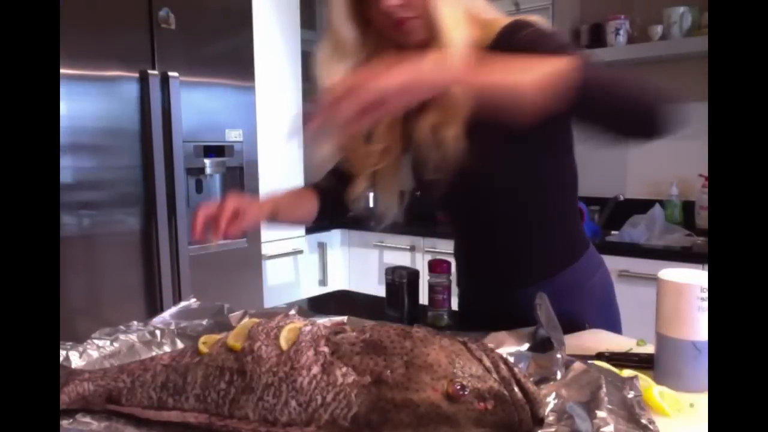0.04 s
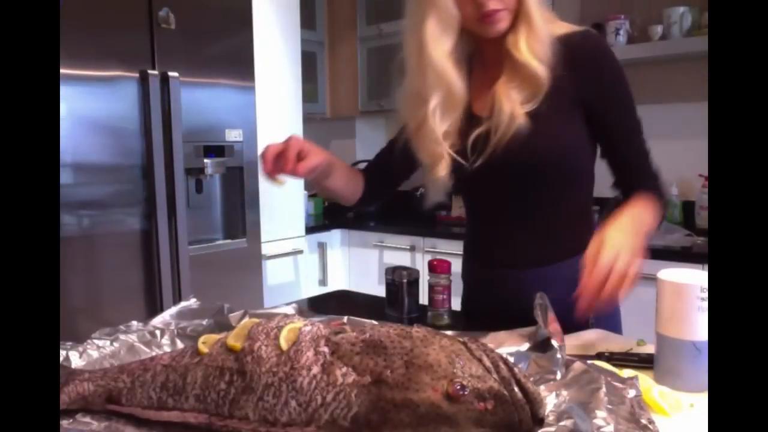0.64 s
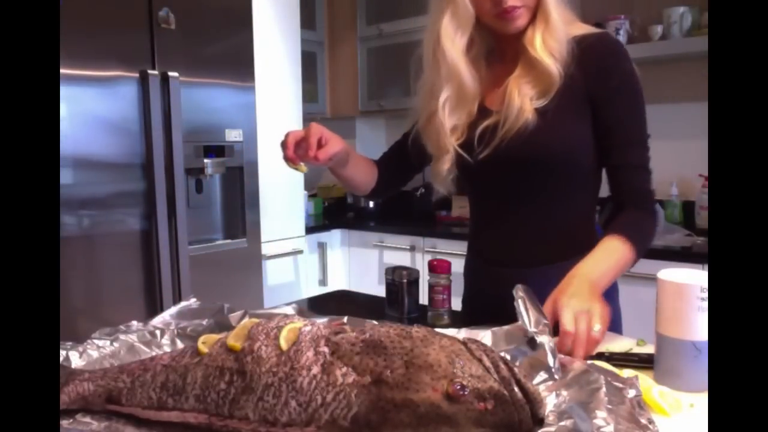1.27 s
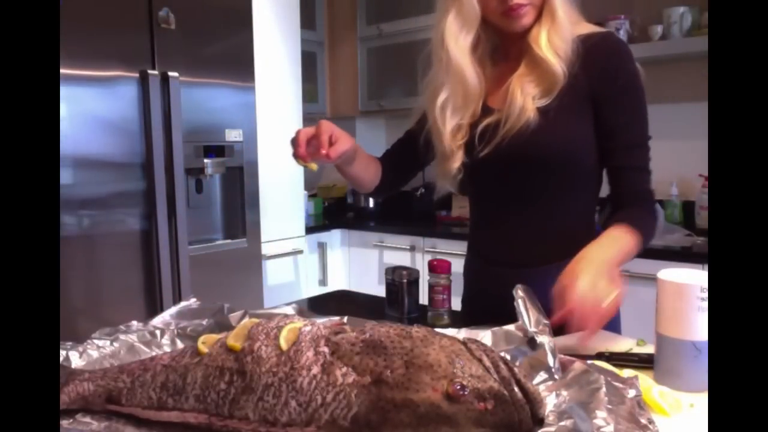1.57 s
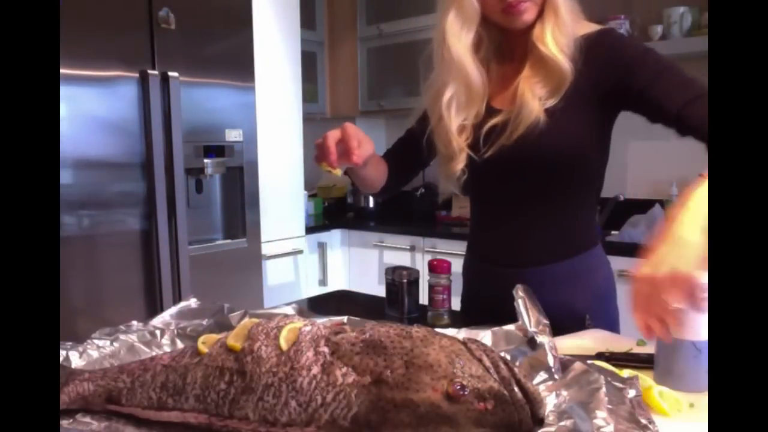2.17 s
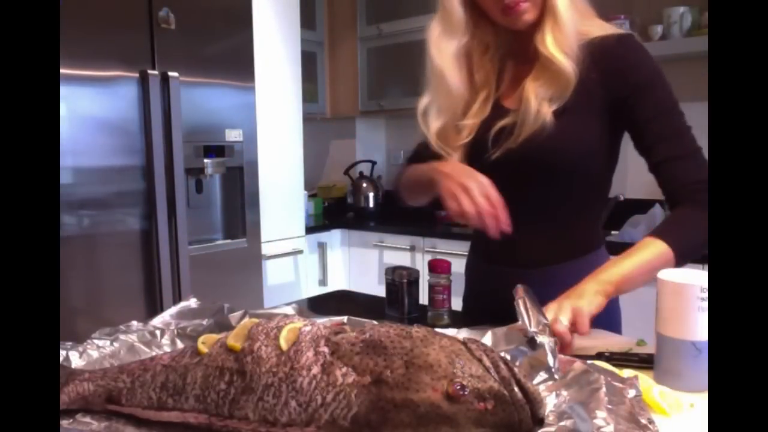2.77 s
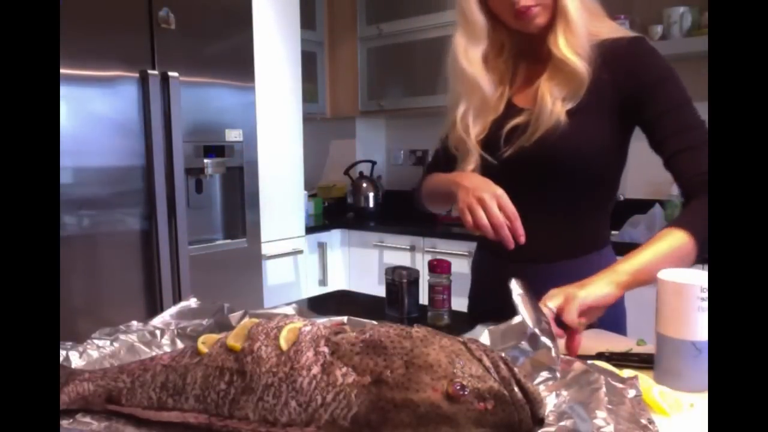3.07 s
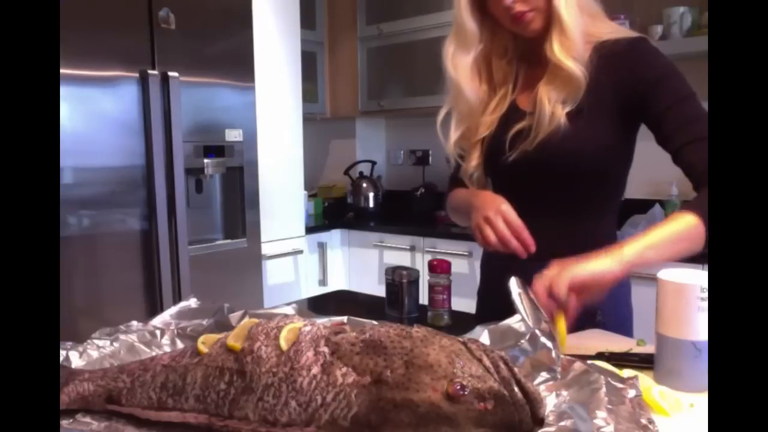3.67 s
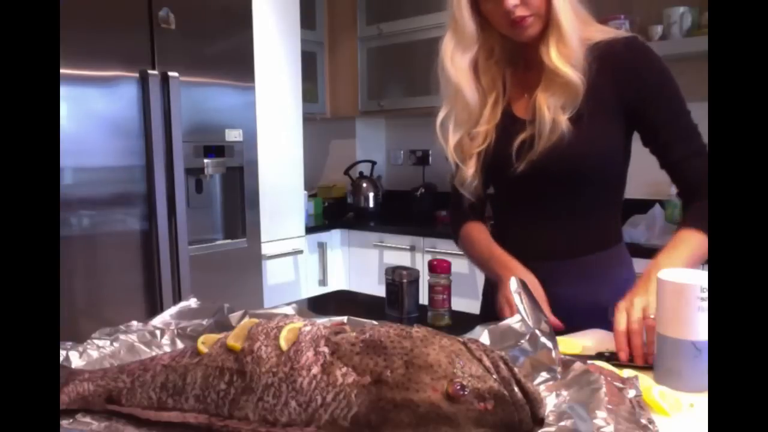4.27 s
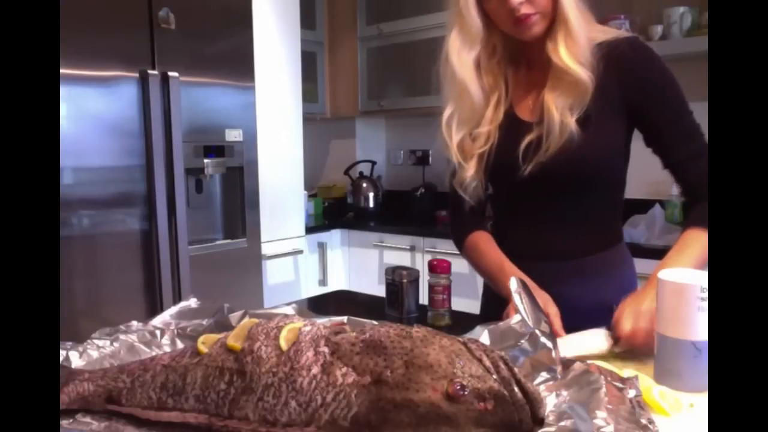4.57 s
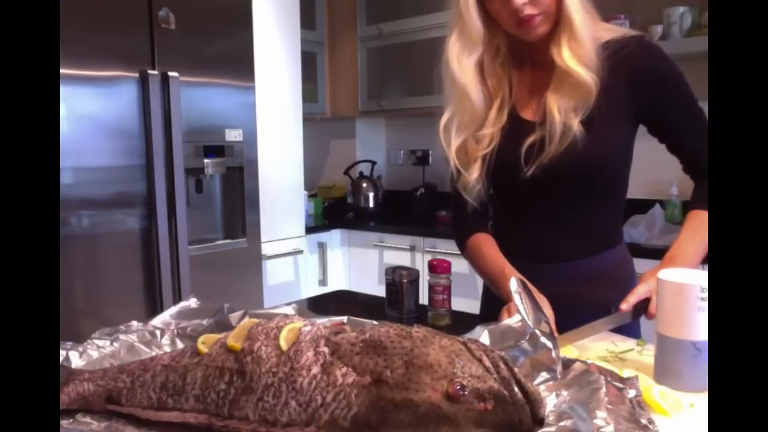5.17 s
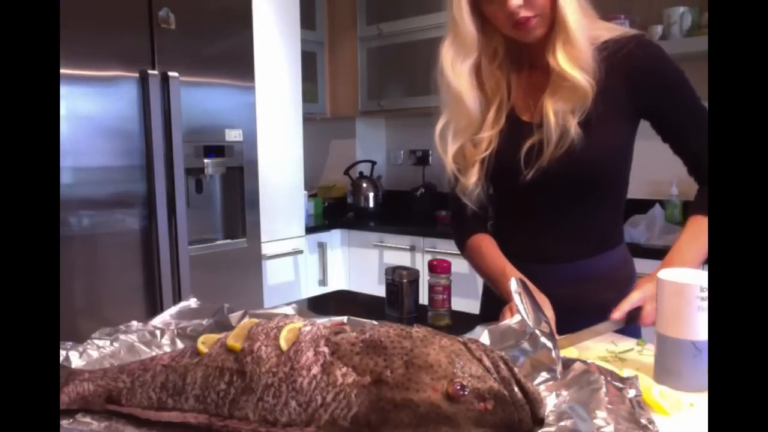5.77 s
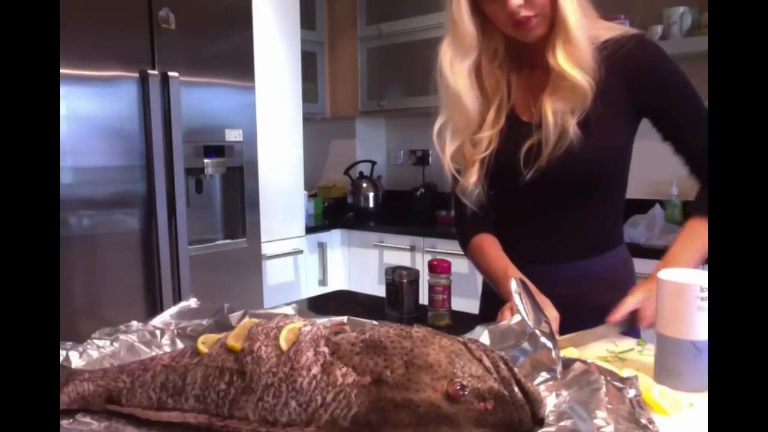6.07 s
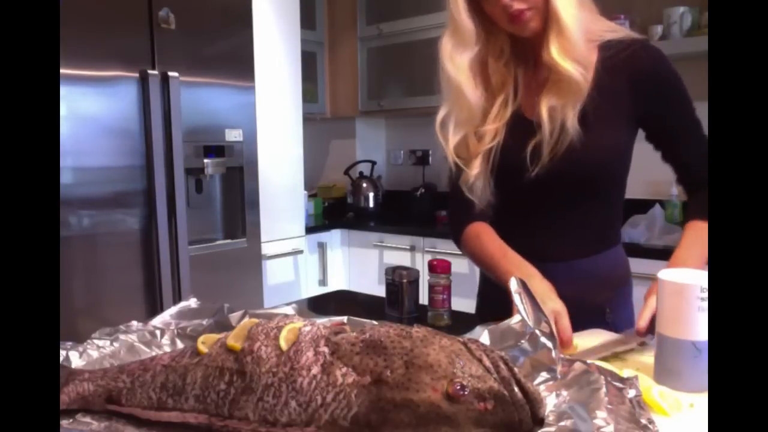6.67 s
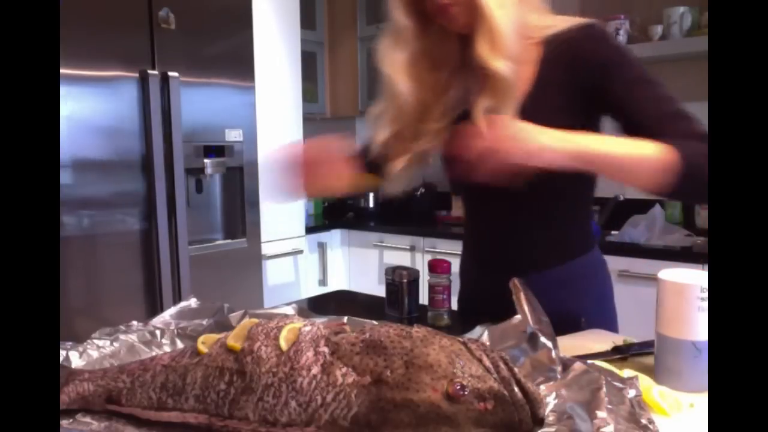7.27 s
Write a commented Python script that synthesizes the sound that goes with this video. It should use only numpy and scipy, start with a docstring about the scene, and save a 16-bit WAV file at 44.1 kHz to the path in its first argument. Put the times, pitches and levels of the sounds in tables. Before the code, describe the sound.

Aluminium foil crackles in short bursts, then a knife chops loudly on a board, squeaks and clatters down in a kitchen.

```python
"""Aluminium foil crackles in bursts as a hand presses it round a fish: each buckle sets off tiny snaps.
A lemon knocks on a board, is chopped with one loud blow and sawn through; the knife squeaks by stick-slip
friction and is dropped with a clatter. The impacts ring in the modes of blade and board and reverberate
in a hard-walled kitchen. Faint ventilation noise lies beneath; a suppressor lowers it in the pauses."""
import sys
import numpy as np
from scipy import signal
from scipy.fft import rfft, irfft
from scipy.io import wavfile
from scipy.ndimage import uniform_filter1d, minimum_filter1d

SR = 44100
rng = np.random.default_rng(int(sys.argv[2]) if len(sys.argv) > 2 else 0)


def store_wav(level_fs):
    """Save 16-bit WAV to argv[1]."""
    pcm = np.round(np.clip(np.atleast_2d(level_fs), -1, 1) * 32767)
    wavfile.write(sys.argv[1], SR, pcm.T.astype(np.int16))


N = 331367
TIME = np.arange(N) / SR
HZ = np.maximum(np.arange(8193) * SR / 16384, 1)   # frequency axis of the spectra


def foil(buckle_db=10.5, crinkle_db=-7.0, flap_db=-21, facet_db=2.25, room_db=1.5):
    """Buckling: the sheet flaps and its facets snap through in a cascade; under the grip it crinkles."""
    # buckles of the sheet: t/s, relative level/dB, tilt above 900 Hz/(dB per octave)
    buckles = [(0.898, -0.5, 4), (0.927, -6, 7), (0.95, -5, 1), (0.980, -5, -0.5), (1.048, -18, -6.5),
               (1.113, -16, -0.5), (1.155, -5, 4), (2.851, -21.5, 0), (2.873, -17, 0), (2.907, -14, 1.5),
               (2.920, -8, 4), (2.954, -5.5, 4), (3.056, -10.5, 2.5), (3.086, -6.5, 1.5), (3.137, -11, 0.5),
               (3.194, -15, 6), (3.248, -12.5, 2), (3.279, -13.5, -2.5), (3.366, -21, 0),
               (3.388, -18, -0.5), (3.417, -15, -0.5), (3.503, -14, 5), (3.512, -11.5, -0.5),
               (6.476, -13, 3), (6.486, -12.5, 0)]
    # spectrum radiated by the foil: f/Hz, level/dB
    foil_colour = [(150, -42), (300, -27.5), (500, -15.5), (750, -18.5), (900, -4.5), (1200, -2.5),
                   (1700, 0.5), (2400, 1), (3200, -1.5), (4300, 2), (5500, -1.5), (7000, -4),
                   (10200, -10.5), (13000, -19), (16000, -24)]
    # grips of the hand: t/s, duration/s, relative level/dB
    grips = [(0.893, 0.08, -21.5), (1.001, 0.21, -32), (2.861, 0.14, -27.5), (3.061, 0.126, -28.5),
             (3.247, 0.14, -42)]
    out, sheet = np.zeros(N), at_hz(foil_colour, HZ)
    facet_hz = np.geomspace(600, 16000, 36)
    for s, db, tilt_db in buckles:
        facets = np.interp(HZ, facet_hz, rng.normal(0, facet_db, len(facet_hz)))
        tilt = tilt_db * np.log2(np.maximum(HZ, 900) / 4000)
        flap_spectrum = np.maximum(2 * band(719, width_hz=890), -70)
        buckle = from_db(flap_db) * contact(flap_spectrum, decay_s=0.016)
        snaps = cascade(decay_s=0.0075 * from_db(0.51 * db))   # stronger buckles last longer
        add(buckle, 0, signal.fftconvolve(snaps, response(sheet + facets + tilt)))
        add(out, s, from_db(db + buckle_db) * kitchen(buckle, room_db))
    hand = sum(from_db(db) * gesture(s, length_s, attack_s=0.006, release_t60=0.054)
               for s, length_s, db in grips)
    crinkle = rms_one(filtered(grains(per_s=900, spread_db=5.5, size=N), sheet))
    return out + from_db(crinkle_db) * kitchen(hand * crinkle, room_db)


def cascade(decay_s, crack_db=-14.5):
    """Avalanche: a first crack releases tiny snaps that swell quickly and die away; unit energy."""
    age = TIME[:SR // 8] / max(decay_s, 1e-3)
    snaps = energy_one(grains(per_s=2400, spread_db=4.0, size=len(age)) * np.sqrt(age) * np.exp(-age))
    snaps[0] = from_db(crack_db)
    return energy_one(snaps)


def chop():
    """Impact excitation: the gripped blade strikes the board, rebounds and rings in its modes."""
    # blow and rebounds: t/s, level/dB, contact decay time/s
    hits = [(4.6917, 18.5, 0.0032), (4.6935, 23, 0.0057), (4.699, 11, 0.003), (4.731, 7, .001),
            (4.762, 10.5, 0.0072)]
    # modes of the gripped blade against the board: f/Hz, bandwidth/Hz, level/dB
    modes = [(836, 45, 8.5), (988, 76, 12), (1560, 54, 3.5), (2005, 170, 9), (2190, 83, 9.5),
             (2410, 130, 10), (3217, 78, 12), (3176, 80, 16.5), (3480, 110, 11.5), (4370, 65, 13),
             (4640, 48, 9.5), (7050, 40, 8.5), (7365, 30, 2), (7770, 22, 8), (8890, 190, 3)]
    # spectral envelope of the blow: f/Hz, level/dB
    colour = [(30, -31), (200, -31.5), (340, -16), (600, -2), (1200, -7.5), (2100, 0), (2750, -13),
              (4000, -6), (6000, -5.5), (9500, -8), (12000, -15), (16000, -22)]
    return steel(hits, modes, colour, room_db=1.0)


def clatter():
    """Repeated impact: the dropped knife lands and rocks to rest, ringing anew at each contact."""
    # landings: t/s, level/dB, contact decay time/s
    hits = [(6.9008, 10, 0.0049), (6.904, 12, 0.0054), (6.910, 3, 0.014), (6.933, 8, 0.018),
            (6.995, 6.5, 0.02), (7.026, 6.5, 0.014)]
    # modes of the loose knife: f/Hz, bandwidth/Hz, level/dB
    modes = [(878, 43, 10.5), (1640, 107, 8.5), (2090, 240, 7), (2440, 84, 8.5), (3050, 47, 1),
             (4550, 25, 11), (5300, 61, 2), (6250, 55, 7), (7080, 70, 7.5), (9070, 55, 3)]
    # spectral envelope of the landings: f/Hz, level/dB
    colour = [(200, -31), (700, -10.5), (1100, -3.5), (2000, -3), (4000, 1.5), (7000, -4), (10000, -6.5),
              (13000, -16.5), (16000, -19)]
    return steel(hits, modes, colour, room_db=5.5)


def steel(hits, modes, colour, room_db):
    """Superposition: each hard contact excites the same modes of the knife, and the responses add."""
    out, body = np.zeros(N), resonances(modes) + at_hz(colour, HZ)
    for s, db, decay_s in hits:
        add(out, s, from_db(db) * kitchen(contact(body, decay_s), room_db))
    return out


def rocking(start_s=6.905, stop_s=7.12, stop_t60=0.29, waver_db=1.5):
    """Forced vibration: the rocking knife feeds the board's low modes, which die fast once it rests."""
    # driven modes of the board: f/Hz, level/dB, rise time/s, T60/s
    modes = [(129.8, -22.5, 0.17, 0.88), (208, -24, 0.095, 0.77), (400, -26, 0.023, 0.67)]
    age = np.maximum(TIME - start_s, 0)
    damping = from_db(-60 * np.maximum(TIME - stop_s, 0) / stop_t60)
    out = np.zeros(N)
    for hz, db, rise_s, t60 in modes:
        swell = 1 - np.exp(-age / rise_s)
        decay = from_db(db + waver_db * wander(samples=900) - 60 * age / t60)
        out += swell * decay * np.sin(2 * np.pi * hz * age)
    return out * damping


def board(level_db=8.0, room_db=-1.5, knock_octaves=1.9, settle_s=0.014):
    """Contact stiffness: a harder object knocks higher; a soft low thud follows as its weight settles."""
    # lemon, hand or knife meets the board: t/s, relative knock level/dB, upper f/Hz, relative thud level/dB
    knocks = [(3.078, -18.5, 810, -13), (4.038, -10.5, 1713, -16), (4.452, -18, 2805, -26.5),
              (4.508, -22.5, 1084, -22.5), (5.889, -15, 1094, -23.5), (6.621, -5.5, 1030, -8.5),
              (6.903, -8.5, 420, -20), (7.010, -10.5, 600, -14.5)]
    out = np.zeros(N)
    for s, knock_db, high_hz, thud_db in knocks:
        knock = board_touch(high_hz / 2 ** knock_octaves, high_hz, decay_s=0.005)
        add(out, s, from_db(knock_db) * kitchen(knock, room_db))
        thud = board_touch(low_hz=125, high_hz=330, decay_s=0.066)
        add(out, s + settle_s, from_db(thud_db) * kitchen(thud, room_db))
    return from_db(level_db) * out


def board_touch(low_hz, high_hz, decay_s):
    """Band-limited excitation: a contact rings those modes of the board that its spectrum reaches."""
    # modes of the board on its worktop: f/Hz, bandwidth/Hz, level/dB
    modes = [(130, 9.8, 10), (209, 26, 12.5), (306, 10, 8.5), (387, 25, 9), (568, 22, 7.5), (744, 30, 5),
             (900, 44, 0.5), (1100, 100, 7), (1443, 46, 2.5), (1630, 35, 10)]
    reach = -10 * np.log10((1 + (low_hz / HZ) ** 6) * (1 + (HZ / high_hz) ** 7) * (1 + (100 / HZ) ** 4))
    return contact(resonances(modes) + np.maximum(reach, -70), decay_s)


def sawing(level_db=-0.5, grip_db=2.5, shift_db=5.5):
    """Fracture: cells of the rind tear one by one; the colour shifts as the edge meets new fibres."""
    # spectrum of tearing rind: f/Hz, level/dB
    rind = [(290, -31), (500, -16), (1000, -9), (1250, -8), (1420, 7), (1600, -1.5), (2000, 3.5),
            (3000, -7), (4200, -8), (6500, -16.5), (10000, -29.5), (15000, -49)]
    # strokes forth and back: t/s, duration/s, relative level/dB, tilt/(dB per octave)
    strokes = [(5.776, 0.13, -40, 2), (6.031, 0.2, -41.5, 1)]
    tearing, fibre_hz = np.zeros(N), np.geomspace(1000, 14000, 40)
    for _ in range(5):
        colour = at_hz(rind, HZ) + np.interp(HZ, fibre_hz, rng.normal(0, shift_db, len(fibre_hz)))
        grip = from_db(grip_db * wander(samples=800))
        tearing += filtered(grip * grains(per_s=330, spread_db=1.5, size=N), colour)
    out = np.zeros(N)
    for s, length_s, db, tilt_db in strokes:
        tilted = filtered(tearing, tilt_db * np.log2(np.clip(HZ, 1000, 7000)))
        stroke = gesture(s, length_s, attack_s=0.065, release_t60=0.21)
        out += stroke * from_db(db + level_db) * rms_one(tilted)
    return out


def squeak(jitter=0.016, scrape=0.063):
    """Stick-slip friction: one pulse per slip, slightly uneven, and a little scraping ring the blade."""
    # slide of the edge on the board: t/s, slip rate/Hz, level/dB
    slide = [(6.72, 385, -56), (6.749, 304, -41), (6.759, 347, -29.5), (6.794, 365, -28.5),
             (6.81, 420, -43.5), (6.843, 430, -47), (6.89, 480, -58)]
    # spectral envelope of the squeak: f/Hz, level/dB
    colour = [(200, -17), (355, -2.5), (700, -14.5), (1100, -11.5), (1800, -16.5), (2800, -24.5),
              (5000, -34.5), (8000, -50), (11000, -46), (15000, -72)]
    # modes of the sliding blade: f/Hz, bandwidth/Hz, level/dB
    modes = [(3776, 30, 15), (4384, 42, 17), (5530, 25, 16.5), (5300, 30, 10), (7770, 35, 16),
             (9930, 50, 14)]
    s, slip_hz, db = np.transpose(slide)
    rate = np.interp(TIME, s, slip_hz) * (1 + jitter * wander(samples=200))
    pulses = np.diff(np.floor(np.cumsum(rate) / SR), prepend=0) - rate / SR   # zero mean
    friction = pulses + scrape * rng.standard_normal(N)
    envelope = from_db(np.interp(TIME, s, db, left=-150, right=-150))
    return envelope * rms_one(filtered(friction, at_hz(colour, HZ) + resonances(modes)))


def ticks(room_db=-10.0, top_hz=10000):
    """Damped resonance: things handled close by click, each at a single pitch."""
    # small contacts: t/s, level/dB, f/Hz, bandwidth/Hz
    clicks = [(0.195, -26, 2560, 400), (0.359, -30, 10150, 1000), (2.195, -20.5, 2600, 300),
              (3.923, -27, 3250, 500), (4.0395, -10, 3720, 4250), (4.448, -22.5, 3770, 694)]
    out = np.zeros(N)
    for s, db, hz, width_hz in clicks:
        peak = band(hz, width_hz) - 20 * np.log10(1 + (HZ / top_hz) ** 8)
        click = contact(np.maximum(peak, -80), decay_s=0.0015)
        add(out, s, from_db(db) * kitchen(click, room_db))
    return out


def ventilation(rush_db=-57, hiss_db=-61):
    """Stationary broadband noise: a low rush of air with a thin hiss on top."""
    # spectrum of the rush: f/Hz, level/dB
    rush = [(25, -60.5), (50, -26), (87, -10.5), (150, -3), (215, 2.5), (330, -7.5), (620, -10),
            (820, -5.5), (1400, -16), (2200, -19.5), (3200, -29), (8000, -49), (16000, -69.5)]
    # spectrum of the hiss: f/Hz, level/dB
    hiss = [(300, -4.5), (1000, -5), (1800, 1), (3000, -7), (4000, -2.5), (4800, 0), (5300, -7.5),
            (6200, -5), (8000, -16.5), (14500, -21.5), (16000, -30.5)]
    out = np.zeros(N)
    for colour, db in (rush, rush_db), (hiss, hiss_db):
        noise = rng.standard_normal(N + 2 * len(HZ))
        steady = signal.fftconvolve(noise, response(at_hz(colour, HZ)), "valid")[:N]
        out += from_db(db) * rms_one(steady)
    return out


def kitchen(sound, room_db, early_s=0.007, gap_s=0.0015):
    """Reverberation: direct sound, strong early reflections, then a diffuse tail, drawn anew each time."""
    # reverberation time of the room: f/Hz, T60/s
    room_t60 = [(100, 0.24), (400, 0.38), (800, 0.49), (2300, 0.61), (4500, 0.49), (7500, 0.47),
                (11000, 0.4), (16000, 0.11)]
    hz, s = np.linspace(0, SR / 2, 129)[:, None], np.arange(240) * 128 / SR
    fading = from_db(-60 * s / at_hz(room_t60, hz))
    diffuse = rng.standard_normal(fading.shape) + 1j * rng.standard_normal(fading.shape)
    tail = signal.istft(fading * diffuse)[1]
    t = TIME[:len(tail)]
    echo = from_db(room_db) * energy_one(tail * (t > gap_s) * (1 + np.exp(-t / early_s)))
    echo[0] = 1   # direct path
    return signal.fftconvolve(sound, energy_one(echo))[:N]


def contact(body_db, decay_s):
    """Broadband excitation: a short, dense rattle, spectrally flattened, gives each mode its share."""
    t = TIME[:SR // 6]
    force = energy_one(rng.standard_normal(len(t)) * np.exp(-t / decay_s))
    power = np.abs(rfft(force, 2 * (len(HZ) - 1))) ** 2
    return energy_one(signal.fftconvolve(force, response(body_db - 10 * np.log10(power + 0.3))))


def grains(per_s, spread_db, size):
    """Poisson process: random clicks, many small and a few large."""
    sizes = from_db(spread_db * np.minimum(rng.exponential(1, size), 4))
    return sizes * rng.choice([-1, 1], size) * (rng.random(size) < per_s / SR)


def gesture(s, length_s, attack_s, release_t60):
    """Amplitude envelope of a hand movement: linear rise, hold, exponential decay."""
    rise = np.clip((TIME - s) / attack_s, 0, 1)
    return rise * from_db(-60 * np.clip((TIME - s - length_s) / release_t60, 0, 3))


def wander(samples):
    """Slow fluctuation: a moving average of white noise; unit RMS."""
    return rms_one(uniform_filter1d(rng.standard_normal(N), size=samples))


def resonances(modes):
    """Modal spectrum in dB: Lorentzian peaks standing out of a flat response."""
    peaks = sum(from_db(db) ** 2 / (1 + (2 * (HZ - hz) / width) ** 2) for hz, width, db in modes)
    return 10 * np.log10(1 + peaks)


def band(hz, width_hz):
    """Band-pass spectrum in dB about one damped resonance."""
    return -20 * np.log10(1 + ((HZ / hz - hz / HZ) * hz / width_hz) ** 2)


def response(db):
    """Minimum phase: the causal impulse response of a body with this spectrum; unit energy."""
    cepstrum = irfft(np.log(from_db(db)))
    half = len(cepstrum) // 2
    cepstrum[1:half] *= 2
    cepstrum[half + 1:] = 0
    return energy_one(irfft(np.exp(rfft(cepstrum))))


def filtered(force, db):
    """Convolution: a force drives a body with this spectrum."""
    return signal.fftconvolve(force, response(db))[:N]


def at_hz(points, hz):
    """Interpolation of a table on a log-frequency axis."""
    f, value = np.transpose(points)
    return np.interp(np.log(np.maximum(hz, 1)), np.log(f), value)


def add(track, s, sound):
    """Superposition of a sound on the track, starting at time s."""
    start = int(s * SR)
    track[start:start + len(sound)] += sound[:N - start]


def from_db(db):
    return 10 ** (np.asarray(db) / 20)


def rms_one(x):
    return x / np.sqrt(np.mean(x ** 2) + 1e-20)


def energy_one(x):
    return x / np.sqrt(np.sum(x ** 2) + 1e-20)


def scene():
    """Superposition of all sources in one channel."""
    cutting = kitchen(sawing(), room_db=-5.0) + kitchen(squeak(), room_db=-2.5)
    knife = chop() + clatter()
    return (foil() + knife + rocking() + cutting + board() + ticks() + ventilation())[None]


def suppressor(sound, threshold_db=-48, knee_db=8, depth_db=9.5, close_s=0.55):
    """Downward expansion: the gain opens at once for a clear sound and sinks slowly in the pauses."""
    level_db = 10 * np.log10(np.maximum(uniform_filter1d(sound ** 2, size=900), 1e-12))
    opened = np.clip((level_db - threshold_db) / knee_db, 1e-6, 1)
    # peak hold with exponential release
    held = np.exp(np.maximum.accumulate(np.log(opened) + TIME / close_s, axis=-1) - TIME / close_s)
    return sound * from_db(depth_db * (held - 1))


def record(dry, ceiling=1.3, bass_cut_hz=60, treble_cut_hz=15850):
    """Peak limiting holds down the loudest blow; noise suppression and band limiting follow."""
    allowed = ceiling / np.maximum(np.abs(dry), ceiling)
    gain = uniform_filter1d(minimum_filter1d(allowed, size=40), size=40)
    highpass = signal.butter(2, bass_cut_hz, "high", fs=SR, output="sos")
    lowpass = signal.ellip(10, 0.2, 70, treble_cut_hz, fs=SR, output="sos")
    return signal.sosfilt(lowpass, signal.sosfilt(highpass, suppressor(dry * gain)))


dry = scene()
out = record(dry)
store_wav(out)
```